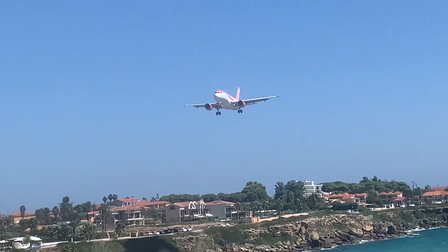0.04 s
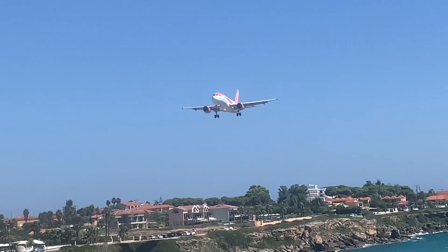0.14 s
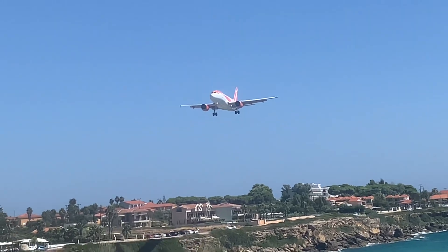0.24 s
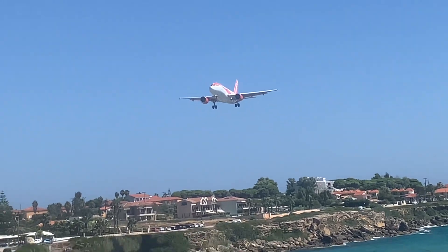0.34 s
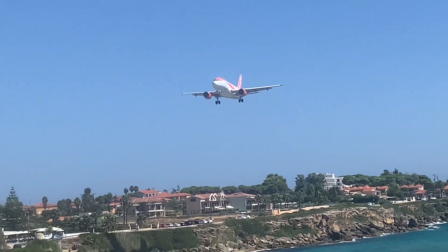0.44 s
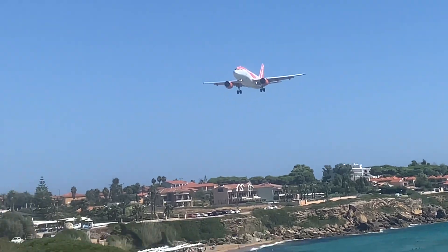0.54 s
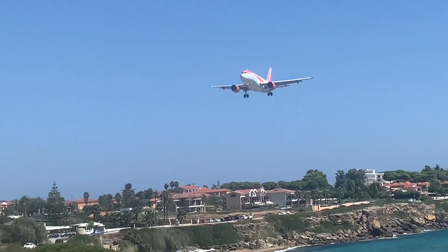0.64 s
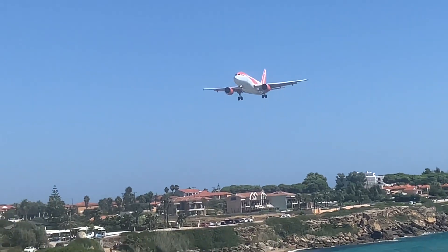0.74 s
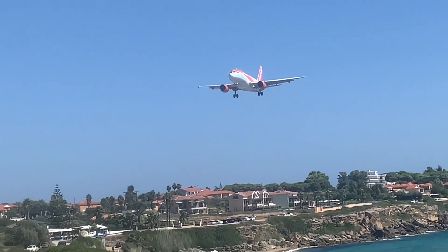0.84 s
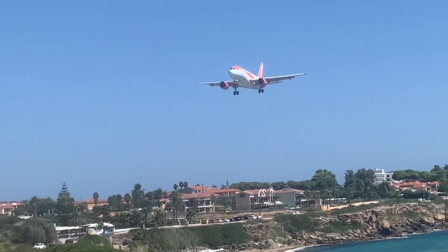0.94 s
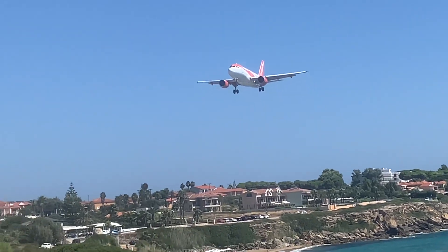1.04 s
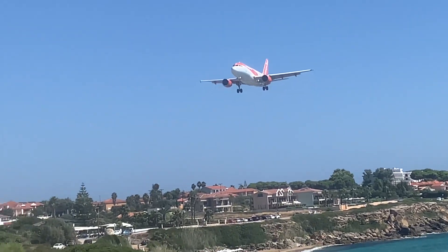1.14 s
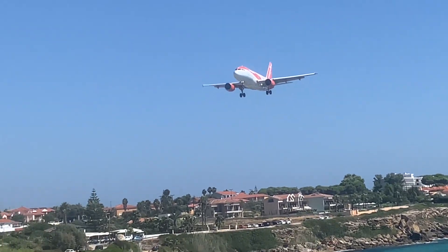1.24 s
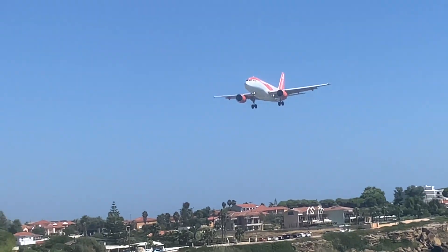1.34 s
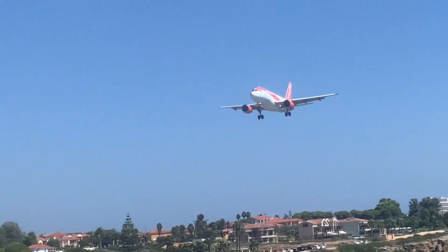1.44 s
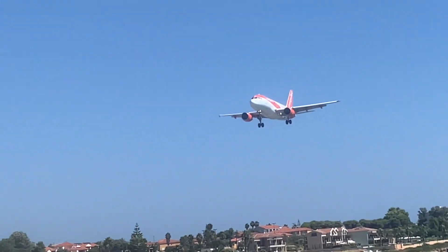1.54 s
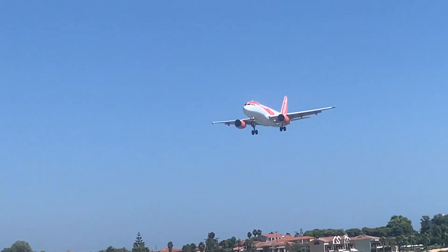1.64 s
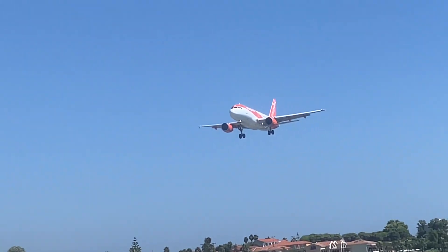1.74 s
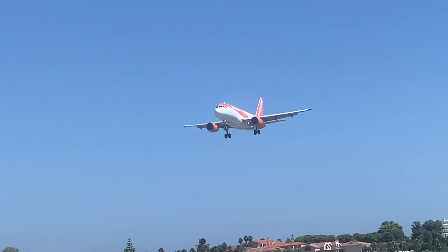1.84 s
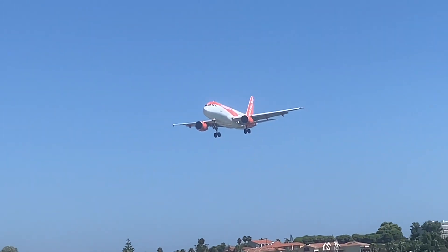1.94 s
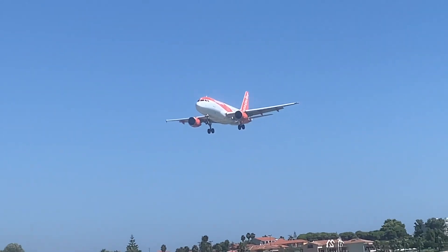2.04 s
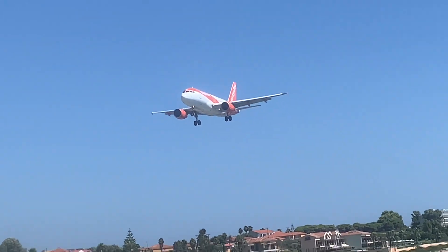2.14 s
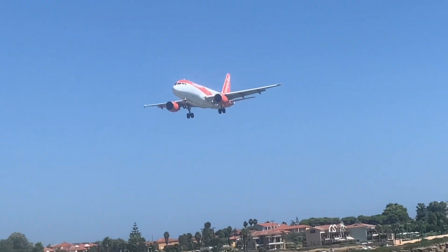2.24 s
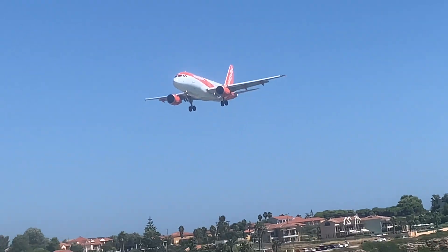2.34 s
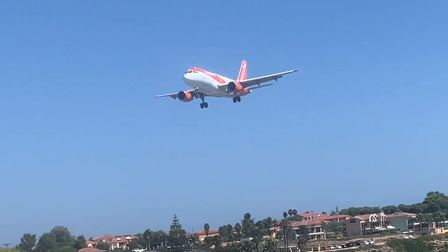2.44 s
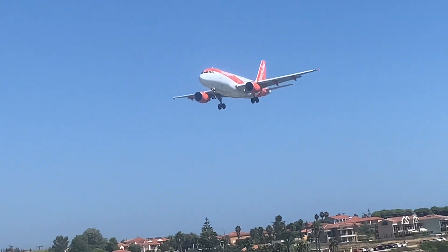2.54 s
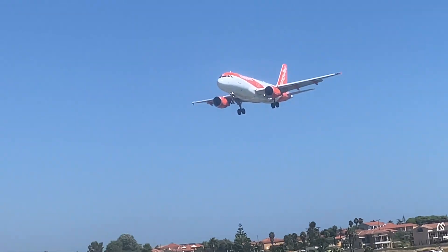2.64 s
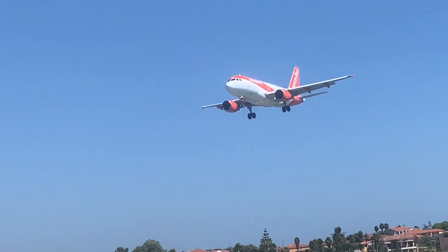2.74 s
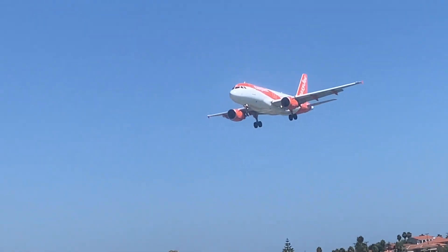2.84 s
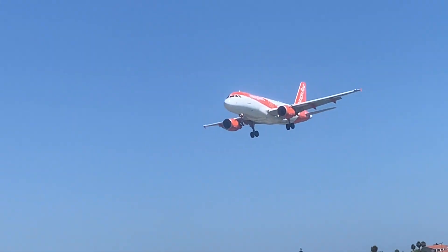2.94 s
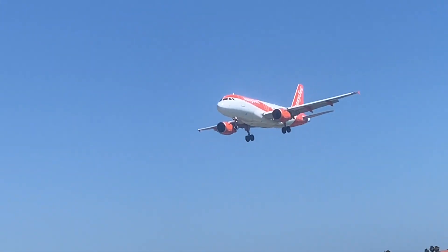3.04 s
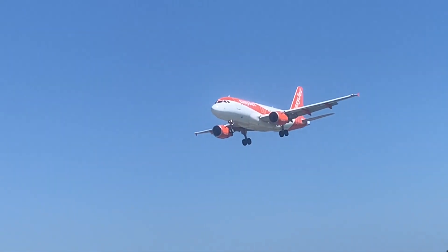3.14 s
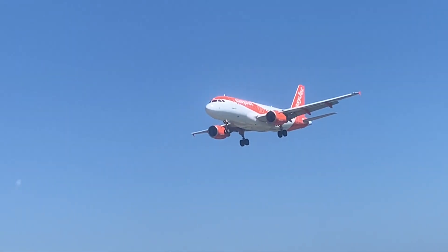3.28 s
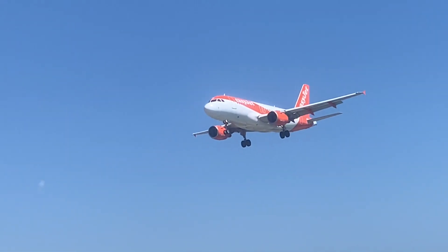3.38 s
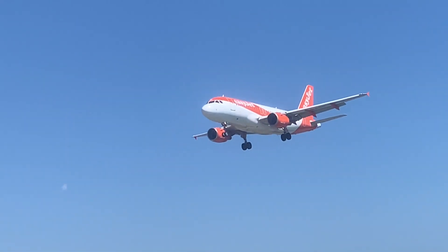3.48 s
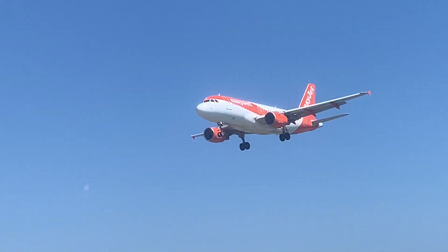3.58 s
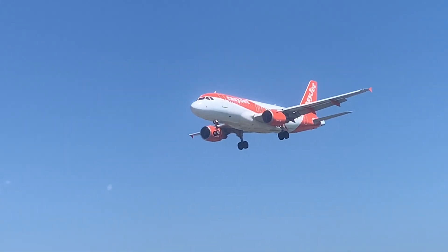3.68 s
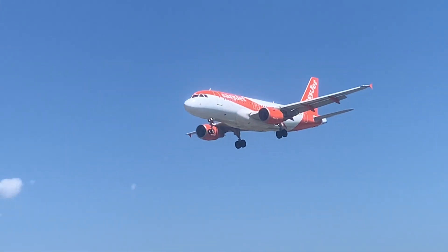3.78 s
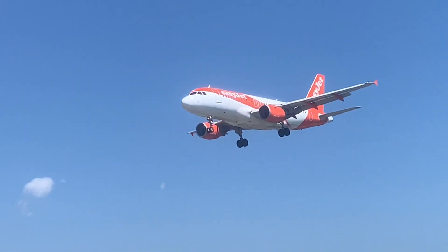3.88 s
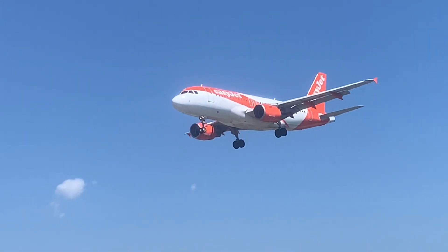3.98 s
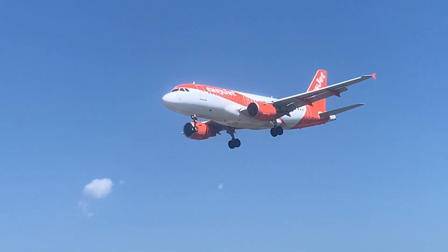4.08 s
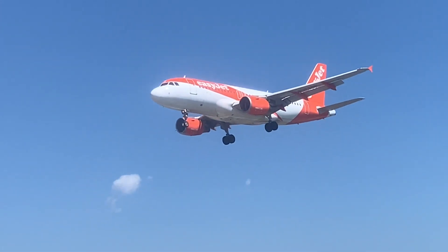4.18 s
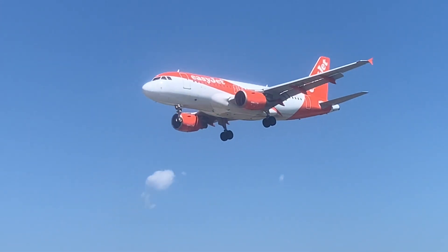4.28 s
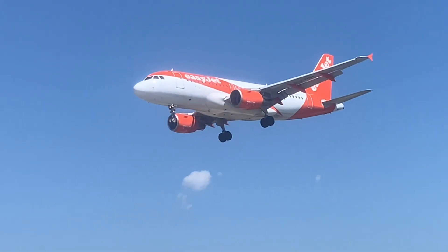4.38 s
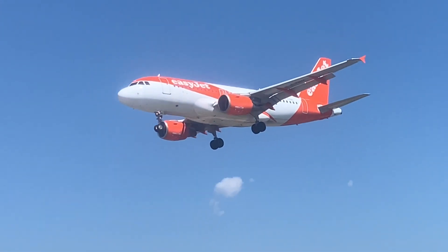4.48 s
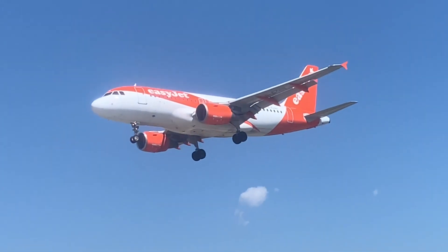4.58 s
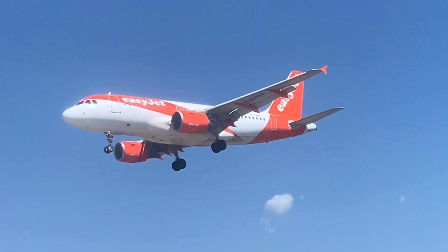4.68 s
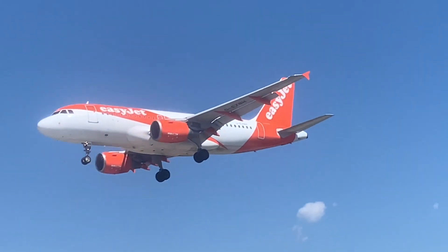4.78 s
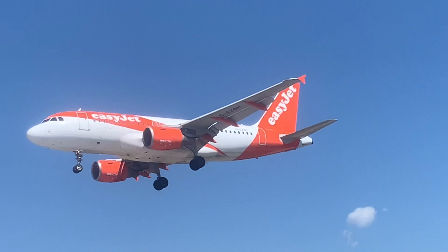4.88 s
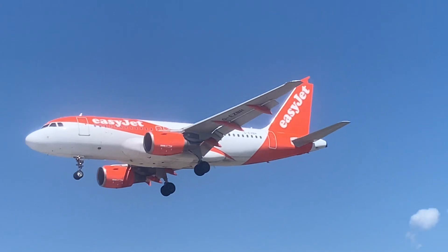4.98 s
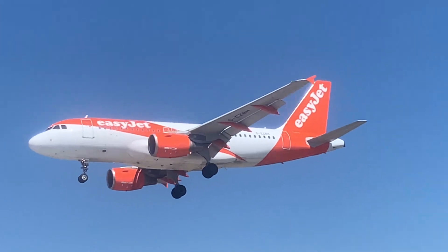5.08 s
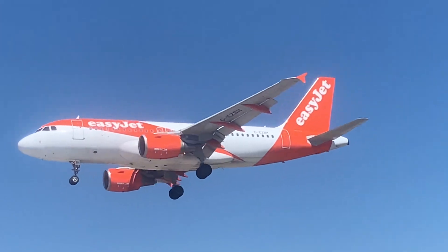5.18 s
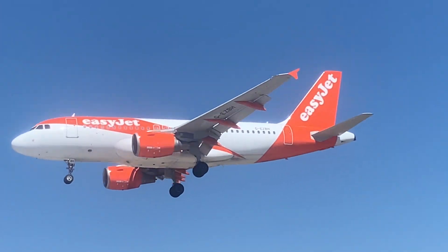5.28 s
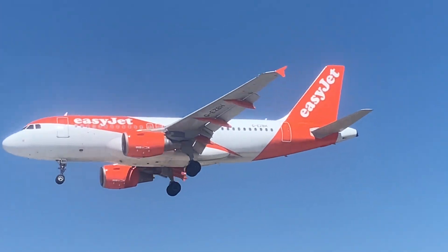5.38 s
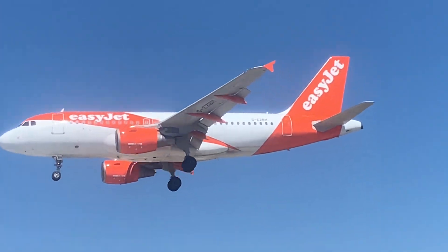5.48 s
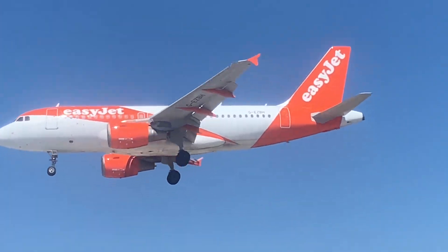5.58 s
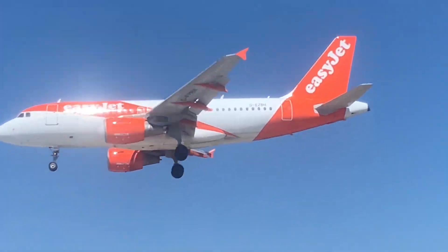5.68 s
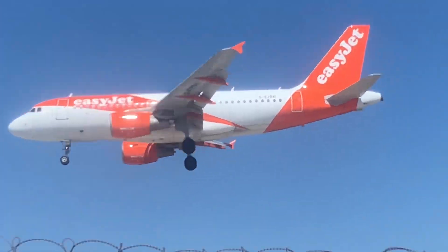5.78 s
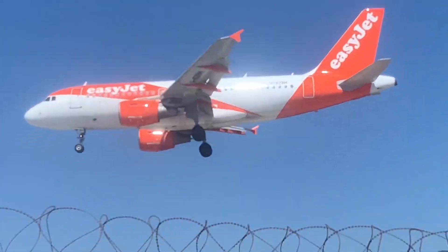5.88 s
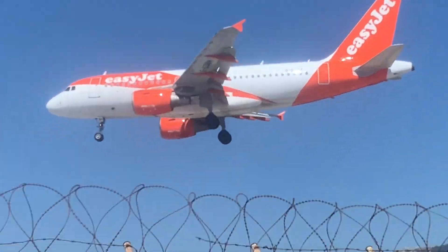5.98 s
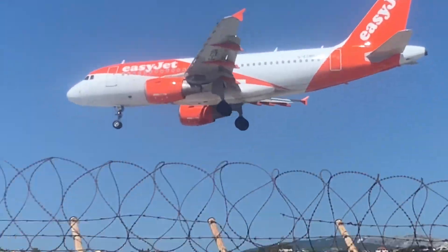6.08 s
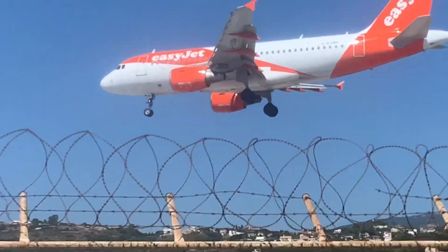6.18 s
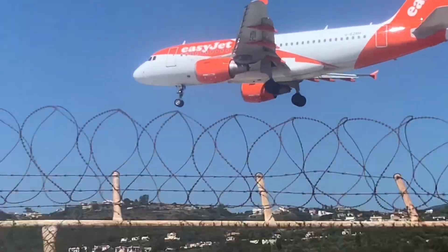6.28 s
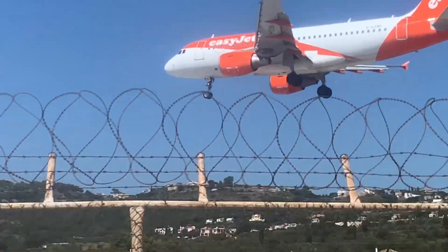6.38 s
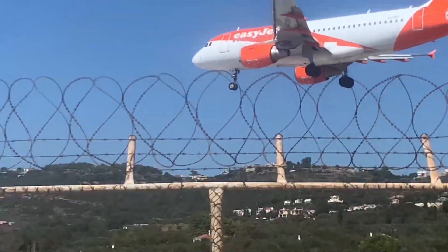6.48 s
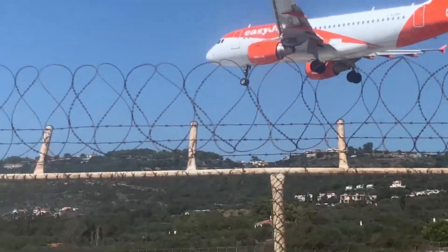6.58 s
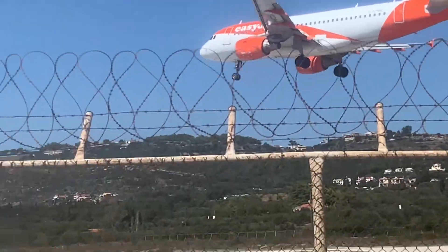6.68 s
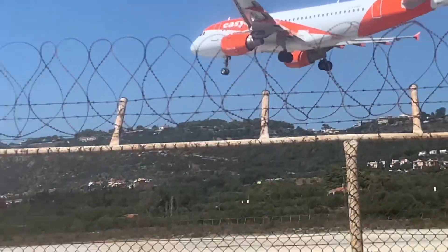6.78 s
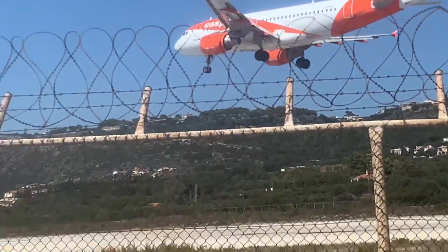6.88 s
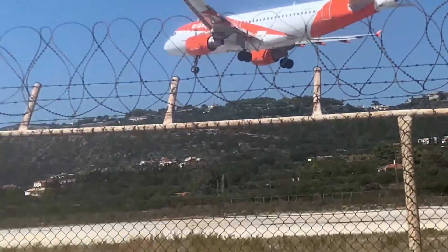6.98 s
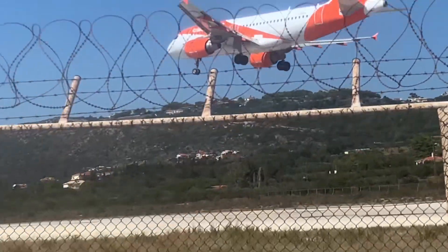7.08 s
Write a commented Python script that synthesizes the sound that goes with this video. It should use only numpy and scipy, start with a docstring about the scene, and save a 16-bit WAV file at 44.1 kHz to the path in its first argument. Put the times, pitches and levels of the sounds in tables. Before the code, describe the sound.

A twin-engine airliner comes in low and passes close, its roar swelling and its whine sliding down, after wind buffets the microphone.

```python
"""A shore under a landing approach: a twin-engined airliner comes in low and passes close by.
While it is still far off, gusts of sea wind buffet the microphone. Air rushing over fans, flaps and
wheels hisses, and the jets mix with the air in a roar that swells, surges and echoes off the ground.
The fan whine and compressor tones rise as the engines spool up, then slide down with the Doppler
shift as the aircraft goes past."""
import sys
import numpy as np
from scipy import signal
from scipy.fft import rfft, irfft, next_fast_len
from scipy.io import wavfile
from scipy.ndimage import uniform_filter1d, map_coordinates

SR = 44100
rng = np.random.default_rng(int(sys.argv[2]) if len(sys.argv) > 2 else 0)


def persist_wave(psi):
    """Save psi, clipped to +-1, as 16-bit WAV."""
    counts = np.round(np.clip(psi, -1, 1) * 32767).astype(np.int16)
    wavfile.write(sys.argv[1], SR, np.atleast_2d(counts).T)


N = 313992
SPEED_M_PER_S, CLOSEST_S, CLOSEST_M = 69.3, 5.59, 74.4  # a straight line past the microphone
SURGE_RISE_S, SURGE_FALL_S = 0.013, 0.039


def amp(db):
    """Decibels to gain."""
    return 10 ** (np.asarray(db) / 20)


def unit(x):
    """Scale to rms 1."""
    return x / np.sqrt(np.mean(x ** 2) + 1e-20)


def along(points, hz):
    """Read (freq_hz, value) points on a log frequency axis."""
    freqs, values = np.transpose(points)
    return np.interp(np.log(hz + 1), np.log(freqs + 1), values)


def clock():
    """The time of each sample in seconds."""
    return np.arange(N) / SR


def curves(rows):
    """An automation curve for each column after the time."""
    times, *columns = np.transpose(rows)
    return [np.interp(clock(), times, column) for column in columns]


def wobble(rate_hz):
    """A smooth random curve with rate_hz knots a second."""
    return map_coordinates(rng.standard_normal(int(N * rate_hz / SR) + 4), [clock() * rate_hz])


def passing(peak_s, width_s):
    """A pass-by swell: 1 at its peak, falling like one over the distance."""
    return 1 / np.hypot(1, (clock() - peak_s) / width_s)


def bell(peak_s, width_s):
    """A smooth bump of height 1."""
    return np.exp(-((clock() - peak_s) / width_s) ** 2)


def held(start, end, rise_s, fall_s):
    """Attack, hold and release, from 0 to 1 and back."""
    return np.clip(np.minimum((clock() - start) / rise_s, (end - clock()) / fall_s) + .5, 0, 1)


def filtered(x, response):
    """A static EQ: x through response(hz)."""
    size = next_fast_len(N + SR // 2)
    return irfft(rfft(x, size) * response(np.fft.rfftfreq(size, 1 / SR)), size)[..., :N]


def swept(x, gain):
    """A moving EQ: x through gain(hz, s)."""
    hz, s, bins = signal.stft(x, SR, nperseg=2048)
    return signal.istft(bins * gain(hz[:, None], s), SR, nperseg=2048)[1][..., :N]


def turbulence(spectrum, patchy_db):
    """Two noises, direct and scattered, that fade in patches on their way through the air."""
    bins = signal.stft(rng.standard_normal((2, N)), nperseg=512)[2]
    patches = uniform_filter1d(rng.standard_normal(bins.shape[1:]), size=7, axis=0)
    patches = uniform_filter1d(patches, size=12, axis=1)
    pair = signal.istft(bins * amp(patchy_db * unit(patches)), nperseg=512)[1][:, :N]
    return unit(filtered(pair, lambda hz: amp(along(spectrum, hz))))


def smeared_tone(hz, scatter, spread):
    """Two tones, direct and scattered; turbulent air smears each over a share of its pitch."""
    rate_hz = spread * np.mean(hz)
    carrier = np.exp(2j * np.pi * np.cumsum(hz) / SR)
    paths = [carrier * (1 + scatter * (wobble(rate_hz) + 1j * wobble(rate_hz))) for _ in range(2)]
    return unit(np.real(paths))


def focused_tone(hz, jitter_rad, rate_hz):
    """A direct tone whose phase jitters in the moving air, and a smeared scattered copy."""
    phase = 2 * np.pi * np.cumsum(hz) / SR
    direct = np.cos(phase + jitter_rad * wobble(rate_hz))
    scattered = smeared_tone(hz, scatter=2.9, spread=0.02)[1]
    return np.array([unit(direct), unit(scattered)])


def flight():
    """Distance in metres, and the cosine between the flight path and the line to the microphone."""
    ahead_m = SPEED_M_PER_S * (CLOSEST_S - clock())
    distance_m = np.hypot(ahead_m, CLOSEST_M)
    return distance_m, ahead_m / distance_m


def fan_pitch(idle_hz=1599, thrust_hz=1877, spool_start_s=-.11, spool_end_s=4.51, sound_m_per_s=343):
    """The blade-passing tone rises as the fans spool up, and is Doppler-shifted by the flight."""
    spool = np.clip((clock() - spool_start_s) / (spool_end_s - spool_start_s), 0, 1)
    engine_hz = idle_hz + (thrust_hz - idle_hz) * np.sin(np.pi / 2 * spool) ** 2
    return engine_hz / (1 - SPEED_M_PER_S / sound_m_per_s * flight()[1])


# timed EQ dips (a negative depth lifts): start_s, end_s, centre_hz, width_hz, depth_db
DIP_CUES = [(0.5, 2.6, 1920, 190, 4.5), (-0.5, 2.3, 2755, 145, 12.5), (-.5, 3.6, 3080, 350, -1.5),
            (-.5, 2.6, 3570, 120, 4.5), (-.5, 1.9, 4500, 480, 5), (3, 8, 3050, 97, 9), (6, 8, 835, 55, 6),
            (4.5, 8, 1083, 55, 7), (5, 8, 2230, 84, 6), (3.5, 5.14, 250, 30, 3)]


def narrow_dips(hz, s, fade_s=0.5):
    """Narrow dips fade in and out of the aircraft's noise, hollowing its tone."""
    db = 0
    for start, end, centre, width, depth in DIP_CUES:
        present = np.clip(np.minimum(s - start, end - s) / fade_s + .5, 0, 1)
        db = db - depth * present * np.exp(-((hz - centre) / width) ** 2)
    return amp(db)


# how far the left port leads the right: freq_hz, phase_rad
LEFT_LEAD = [(200, 0), (400, -.3), (600, .1), (760, 1.1), (850, 3.2), (950, 5.7), (1040, 6.8), (1210, 9.3),
             (1310, 7.4), (1600, 5.1), (1900, 4.4), (2330, 5.3), (3000, 3.3), (3600, 3.6), (3850, 5.4),
             (4500, 6.5), (5200, 9.3), (5600, 10), (6100, 12.2), (6900, 13), (7600, 15.8), (9000, 17.8),
             (10400, 21.6)]
# stereo width, the share of sound that differs between the ports: freq_hz, share_db
WIDTH = [(200, -28.5), (450, -43), (850, -9.5), (1300, -24), (1900, -13), (3500, -8.5), (6500, -13.5),
         (9000, -2)]
# the left port's duller top end: freq_hz, gain_db
LEFT_EQ = [(7000, 0), (7850, -2), (8050, -11), (8900, -10), (9500, -18)]


def microphone_ports(paths, shift_hz=55, head_on_s=2.64, side_on_s=4.7):
    """Two ports hear direct sound alike and scattered sound opposed; phases slide as the pair turns."""
    def share(hz):
        return np.clip(amp(along(WIDTH, hz)), 0, 1)

    def lead(hz, s):
        slide_hz = np.interp(s, [head_on_s, side_on_s], [shift_hz, 0])
        return along(LEFT_LEAD, np.maximum(hz - slide_hz, 0))

    direct, scattered = paths
    mid = filtered(direct, lambda hz: np.sqrt(1 - share(hz) ** 2))
    side = filtered(scattered, share)
    left = swept(mid + side, lambda hz, s: amp(along(LEFT_EQ, hz)) * np.exp(.5j * lead(hz, s)))
    right = swept(mid - side, lambda hz, s: np.exp(-.5j * lead(hz, s)))
    return np.array([left, right])


# gusts on the microphone: start_s, end_s, buffet_db, crackle_db
GUST_CUES = [(-.1, 0.204, -42.5, -60), (0.271, 0.556, -35.5, -48.5), (0.362, 0.47, -31.5, -44),
             (0.875, 1.132, -40, -49), (1.216, 1.574, -34, -41.5), (1.286, 1.49, -31.5, -39.5),
             (1.804, 3.12, -33.5, -39), (1.935, 2.288, -33.5, -31.5), (2.102, 2.212, -32.5, -26.5),
             (2.29, 2.9, -36, -35)]
# the wind's boomy buffet and its low crackle: freq_hz, level_db
BUFFET_EQ = [(18, -40.5), (40, -8), (70, 5), (165, -0.5), (250, -4.5), (330, -4.5), (500, -11.5),
             (900, -27), (2000, -36.5), (5000, -85)]
CRACKLE_EQ = [(100, -12.5), (190, 1.5), (300, -6), (600, -14), (1000, -20), (1600, -31), (4000, -76)]


def sea_wind(breeze_db=-48.5, build_db_per_s=5.5, lull_s=3.16, dying_db_per_s=30):
    """Gusts buffet and crackle on the microphone over a breeze that freshens, then dies away."""
    breeze = amp(breeze_db + build_db_per_s * clock() - dying_db_per_s * np.maximum(clock() - lull_s, 0))
    buffet_gain, crackle_gain = breeze, breeze * amp(-13)
    for start, end, buffet_db, crackle_db in GUST_CUES:
        gust = held(start, end, rise_s=0.019, fall_s=0.074)
        buffet_gain = np.hypot(buffet_gain, gust * amp(buffet_db))
        crackle_gain = np.hypot(crackle_gain, gust * amp(crackle_db))
    sputter = wobble(40.08)
    lumps = amp(1.2 * sputter + 1.6 * wobble(160))
    buffet = unit(lumps * turbulence(BUFFET_EQ, patchy_db=0.7)[0])
    bursts = amp(1.1 * sputter + 3.3 * wobble(140))  # small eddies tearing off
    crackle = unit(bursts * turbulence(CRACKLE_EQ, patchy_db=1.7)[0])
    return buffet_gain * buffet + crackle_gain * crackle


# single eddy hits: start_s, flick_db, puff_db
EDDY_HITS = [(.279, -37, -36.5), (.408, -22, -34), (.511, -27, -29.5), (.879, -33, -34), (.988, -30, -31.5),
             (1.215, -32, -29.5), (1.306, -32, -28), (1.385, -21.5, -30), (1.804, -32, -30.5),
             (1.97, -15.5, -27), (2.108, -18.5, -29), (2.236, -27, -28), (2.537, -27, -31), (2.6, -28, -31),
             (2.649, -25, -30), (2.744, -28, -33)]
# the dull puff after each hit: freq_hz, level_db
PUFF_EQ = [(50, -18), (150, -1.5), (330, -1), (600, -7.5), (1000, -21), (1600, -36), (4000, -78)]


def eddy_slaps(flick_s=0.00037, puff_rise_s=0.0027, puff_fall_s=0.018):
    """Single eddies slap the microphone with a sharp flick and a short puff."""
    flicks, puffs = np.zeros((2, N))
    for start, flick_db, puff_db in EDDY_HITS:
        offset = (clock() - start) / flick_s
        flicks -= amp(flick_db) * (1 - offset ** 2) * np.exp(-offset ** 2 / 2)
        age = np.maximum(clock() - start, 0)
        puffs += amp(puff_db) * (1 - np.exp(-age / puff_rise_s)) * np.exp(-(age / puff_fall_s) ** 2)
    return flicks + puffs * turbulence(PUFF_EQ, patchy_db=1.0)[0]


# fader ride shared by the airflow, the high tones and the fan whine's floor: time_s, level_db
TREBLE_RIDE = [(0, -63), (0.5, -63), (1.05, -59), (1.6, -57), (2.3, -52), (2.75, -51.5), (3.06, -44.5),
               (3.25, -40), (3.9, -43), (4.4, -41), (4.72, -37), (5.55, -45), (6.2, -44), (7.12, -45.5)]
# midrange rush (also in the exhaust), bright hiss and top-end fizz: freq_hz, level_db
RUSH_EQ = [(250, -10), (800, -5.5), (1200, -2), (1450, -0.5), (1750, 4.5), (2100, -1.5), (2300, -15),
           (2550, -4.5), (3200, -54)]
HISS_EQ = [(1600, -42), (2100, 2.5), (2450, 3.5), (2700, 6.5), (3050, 1.5), (3400, -1), (3800, -5.5),
           (4300, -7.5), (5100, -12), (6200, -18.5), (8000, -53)]
FIZZ_EQ = [(4000, -9), (5500, 0.5), (6300, 1.5), (7100, 2.5), (7800, -1.5), (8050, 11), (8500, 3.5),
           (9100, -2), (10200, -10), (10900, -53)]


def airflow(rush_db_per_m=0.0183, hiss_db_per_m=0.032, fizz_db_per_m=-0.036):
    """Broad noise of fans, flaps and wheels; distance dulls it, and it flutters in the moving air."""
    treble_db, = curves(TREBLE_RIDE)
    beyond_m = flight()[0] - CLOSEST_M
    flutter = wobble(30)
    rush = amp(6.0 + rush_db_per_m * beyond_m + 0.59 * wobble(25.07)) * turbulence(RUSH_EQ, 0.9)
    hiss = amp(7.0 + hiss_db_per_m * beyond_m + 1.23 * flutter) * turbulence(HISS_EQ, 2.0)
    fizz = amp(4.5 + fizz_db_per_m * beyond_m + 1.4 * flutter) * turbulence(FIZZ_EQ, 2.0)
    return amp(treble_db) * (rush + hiss + fizz)


# accents in the hiss: peak_s, half_width_s, level_db
FLARE_CUES = [(2.3, 0.032, -41), (3.11, 0.024, -29.5), (3.19, 0.05, -31.5), (3.35, 0.045, -23),
              (3.658, 0.045, -17.5), (3.81, 0.029, -28.5)]
# their upper-mid bite: freq_hz, level_db
FLARE_EQ = [(800, -37), (1400, -3), (1750, 3.5), (2200, -3), (2700, 2), (3200, -10), (4500, -19.5),
            (6500, -29), (9000, -48)]


def hiss_flares():
    """The hiss flares briefly in the moving air."""
    swells = sum(amp(db) * bell(peak, width) for peak, width, db in FLARE_CUES)
    return swells * turbulence(FLARE_EQ, patchy_db=1.0)


def ground_echo(paths, echo, longest_lag_s=0.00294):
    """The ground adds a late copy; its notches sink as the aircraft looms higher overhead."""
    lag_s = longest_lag_s * passing(peak_s=6.545, width_s=1.72)
    late = np.array([np.interp(clock() - lag_s, clock(), path) for path in paths])
    return (paths + echo * late) / np.hypot(1, echo)


# deep rumble, full-bodied roar, midrange howl, and a hollow band near 340 Hz where the ground's reflection
# reinforces the sound: freq_hz, level_db
RUMBLE_EQ = [(15, -34), (28, -19.5), (42, -5.5), (62, 0.5), (110, -3), (170, -16.5), (280, -20.5),
             (600, -72)]
ROAR_EQ = [(60, -38), (105, -1.5), (180, 5), (260, 3), (350, 3), (520, -2), (700, -14.5), (1100, -50.5)]
HOWL_EQ = [(350, -41), (580, -3), (720, 0.5), (890, 0), (975, 4.5), (1060, -2.5), (1200, -2.5),
           (1380, -5.5), (1600, -18), (2500, -54)]
DRONE_EQ = [(200, -40), (290, -2.5), (360, -2), (420, -3.5), (560, -40.5)]
# exhaust surges, of which each layer takes its share: start_s, end_s, low_lift_db, high_lift_db
SURGE_CUES = [(3.215, 3.41, 10, 10), (3.409, 3.62, 5, 7), (3.633, 3.875, 12, 17.5), (4.198, 8, 15.5, 16),
              (6.36, 6.66, 4.5, 2.5)]


def exhaust(near_s=3.26, approach_db_per_s=14):
    """The jets mix with the air: rumble, roar, howl and rush build as the aircraft nears, joined by a hollow
    low band that the ground's reflection lifts, and all surge together."""
    distant_db = -approach_db_per_s * np.maximum(near_s - clock(), 0)
    low_db, high_db = sum(np.outer(lifts_db, held(start, end, SURGE_RISE_S, SURGE_FALL_S))
                          for start, end, *lifts_db in SURGE_CUES)

    def layer(eq, db, peak_s, width_s, flutter_db, flutter_hz, patchy_db):
        """One fluttering band that swells and fades over the pass."""
        gain = passing(peak_s, width_s) * amp(db + distant_db + flutter_db * wobble(flutter_hz))
        return gain * turbulence(eq, patchy_db)

    rumble = layer(RUMBLE_EQ, -30.4 + 0.56 * low_db, peak_s=6.22, width_s=1.0,
                   flutter_db=0.42, flutter_hz=12, patchy_db=0.0)
    roar = layer(ROAR_EQ, -34.5 + 0.86 * low_db, peak_s=4.71, width_s=1.87,
                 flutter_db=0.73, flutter_hz=14, patchy_db=0.17)
    howl = layer(HOWL_EQ, -38.5 + high_db, peak_s=5.1, width_s=1.15,
                 flutter_db=0.53, flutter_hz=14, patchy_db=0.97)
    rush = layer(RUSH_EQ, -40 + 0.95 * high_db, peak_s=4.2, width_s=1.32,
                 flutter_db=0.51, flutter_hz=35, patchy_db=2.0)
    drone = layer(DRONE_EQ, -37 + 0.55 * low_db, peak_s=3.7, width_s=0.97,
                  flutter_db=1.0, flutter_hz=19, patchy_db=1.5)
    return ground_echo(rumble + roar, echo=0.46) + ground_echo(howl, echo=0.15) + drone + rush


# passing whistles: start_s, end_s, fan_multiple, level_db, spread_ratio
WHISTLE_CUES = [(0.75, 1.08, 1.045, -50.5, .024), (1.045, 1.11, 1.555, -49, .012),
                (2.222, 2.418, 2.995, -59, .008), (3.15, 3.447, 2.765, -53, 0.0086),
                (4.42, 4.88, .923, -27.5, .008), (4.5, 5.1, .825, -29, .08),
                (4.504, 5.25, 1.965, -44.5, 0.1), (4.296, 5.198, 3.76, -43.5, 0.019),
                (5.197, 5.9, .385, -30, 0.079), (6.044, 6.696, 4.2, -45.5, 0.06)]


def whistles():
    """Narrowly beamed tones and rough bands sweep past on the fan's glide, each swelling and fading."""
    out, fan_hz = np.zeros((2, N)), fan_pitch()
    for start, end, multiple, db, spread in WHISTLE_CUES:
        progress = np.clip((clock() - start) / (end - start), 0, 1)
        swell = np.sqrt(4 * progress * (1 - progress))
        out += amp(db) * swell * smeared_tone(multiple * fan_hz, scatter=2.5, spread=spread)
    return out


# balance of the engine's high tones, far ahead and close: fan_multiple, far_db, close_db
ENGINE_PARTIALS = [(1.999, -9, -21), (2.555, -12, -37), (2.775, -16.5, -20), (2.995, -17, -24),
                   (3.554, -17, -27), (3.725, -22, -26), (3.885, -20, -25)]


def high_tones(close_s=3.7, trim_db=10.5, fading_db=2.5, abeam_db=-9, beam_cosine=.65):
    """Fan overtones and compressor tones share the Doppler glide; they waver, and thin out side-on."""
    fan_hz, (distance_m, cosine) = fan_pitch(), flight()
    close = np.clip(clock() / close_s, 0, 1)
    side_on = np.clip(1 - cosine / beam_cosine, 0, 1)
    beam_db = curves(TREBLE_RIDE)[0] + trim_db + abeam_db * side_on
    out = np.zeros((2, N))
    for multiple, far_db, close_db in ENGINE_PARTIALS:
        air_loss_db = .003 * (distance_m - CLOSEST_M) * multiple ** 2
        level_db = far_db + close * (close_db - far_db) - air_loss_db + fading_db * wobble(10)
        out += amp(beam_db + level_db) * smeared_tone(multiple * fan_hz, scatter=2.4, spread=0.017)
    return out


# the second whine's falling glide: time_s, pitch_hz, level_db
SECOND_GLIDE = [(5.28, 1885, -37), (5.47, 1835, -33), (5.66, 1805, -33), (5.85, 1772, -34),
                (6.02, 1732, -31.5), (6.2, 1700, -30), (6.45, 1680, -31.5), (6.62, 1668, -40)]


def second_whine(fading_db=2.2):
    """A second whine, slightly lower than the first, sinks in pitch as the aircraft passes."""
    hz, db = curves(SECOND_GLIDE)
    gate = held(SECOND_GLIDE[0][0], SECOND_GLIDE[-1][0], SURGE_RISE_S, SURGE_FALL_S)
    return gate * amp(db + fading_db * wobble(24)) * focused_tone(hz, jitter_rad=.75, rate_hz=55)


# lobes of the fan's beam sweeping over the microphone: peak_s, half_width_s, level_db
WHINE_SWELLS = [(2.7, 0.49, -45), (3.5, 0.13, -33), (4.65, 0.11, -31.5), (4.86, 0.12, -29.5),
                (5.09, 0.05, -29.5), (5.23, .04, -30), (5.39, 0.075, -28.5), (6.78, 0.22, -37.5)]


def fan_whine(floor_db=-2, hump_db=-15, octave_db=-22, fading_db=2.3, rough_db=3.0):
    """The intakes throw the fan tone forward in lobes; it flutters in the moving air as it glides."""
    fan_hz = fan_pitch()
    lobes = sum(amp(db) * bell(peak, width) for peak, width, db in WHINE_SWELLS)
    floor = amp(curves(TREBLE_RIDE)[0] + floor_db)
    gain = np.hypot(floor, lobes) * amp(fading_db * wobble(22))
    core = amp(rough_db * wobble(70)) * focused_tone(fan_hz, jitter_rad=1.0, rate_hz=70)
    # sound that crosses the jet's shear layer spreads into humps around the fan tone and its octave
    hump = amp(hump_db) * smeared_tone(fan_hz, scatter=2.7, spread=0.063)
    octave = amp(octave_db) * smeared_tone(2 * fan_hz, scatter=4, spread=0.09)
    return gain * (core + hump + octave)


def scene():
    """The aircraft passes in stereo, with the wind on the microphone in the centre."""
    noise = swept(exhaust() + airflow() + hiss_flares(), narrow_dips)
    aircraft = noise + fan_whine() + second_whine() + high_tones() + whistles()
    return microphone_ports(aircraft) + sea_wind() + eddy_slaps()


def record(dry, mono_start_hz=1080, mono_end_hz=300, top_hz=10700):
    """The recorder folds the bass to mono below a sinking corner and cuts everything above top_hz."""
    def low_cut(hz, s):
        corner_hz = np.interp(s, [0, N / SR], [mono_start_hz, mono_end_hz])
        return 1 / (1 + (corner_hz / (hz + 1)) ** 12)

    mid = (dry[0] + dry[1]) / 2
    side = swept((dry[0] - dry[1]) / 2, low_cut)
    return filtered(np.array([mid + side, mid - side]), lambda hz: hz < top_hz)


dry = scene()
out = record(dry)
persist_wave(out)
```